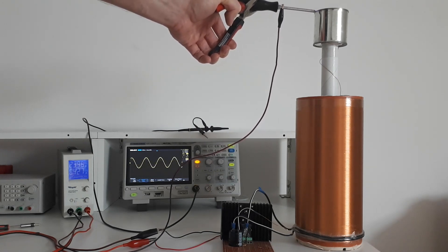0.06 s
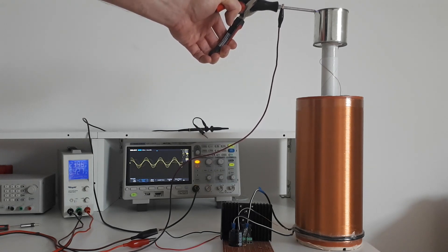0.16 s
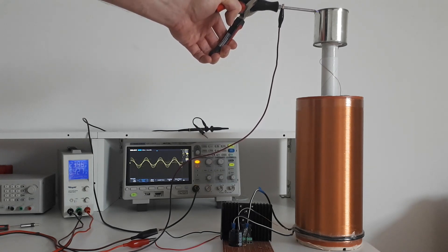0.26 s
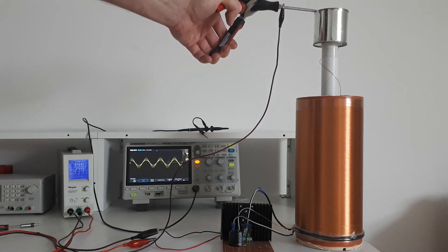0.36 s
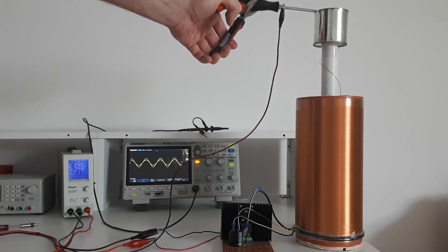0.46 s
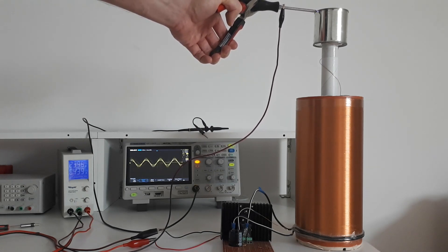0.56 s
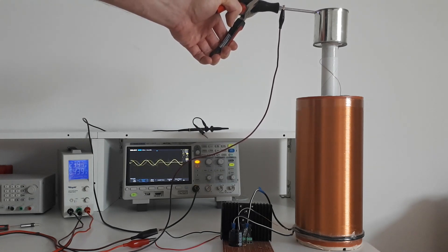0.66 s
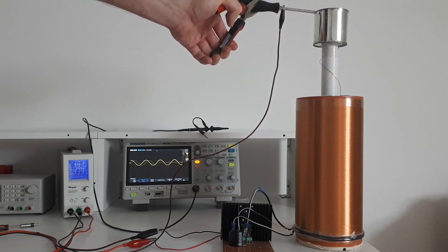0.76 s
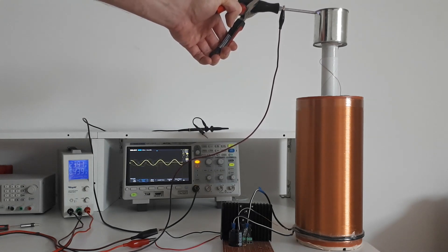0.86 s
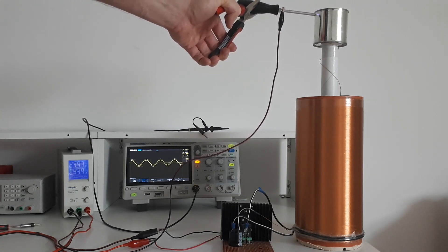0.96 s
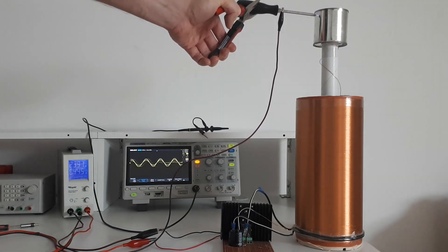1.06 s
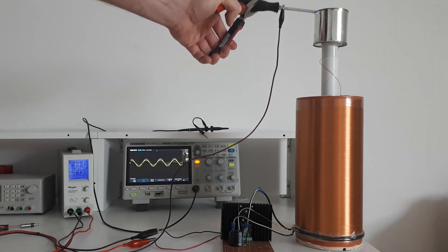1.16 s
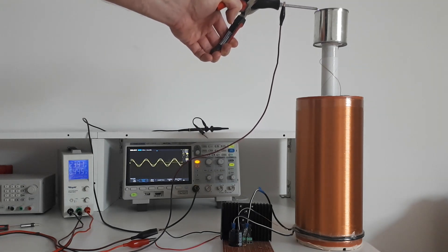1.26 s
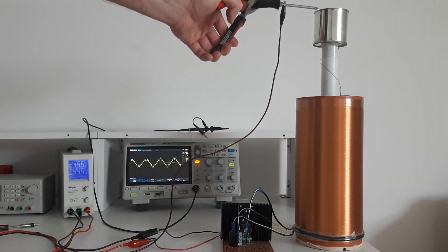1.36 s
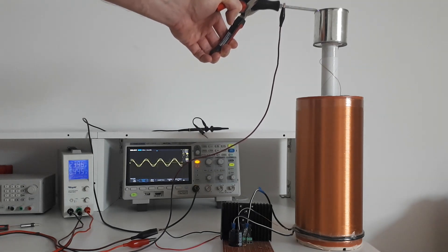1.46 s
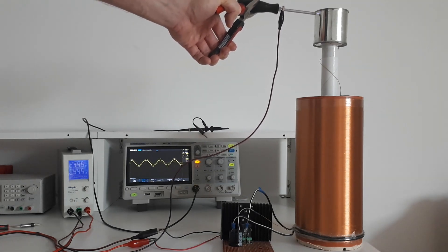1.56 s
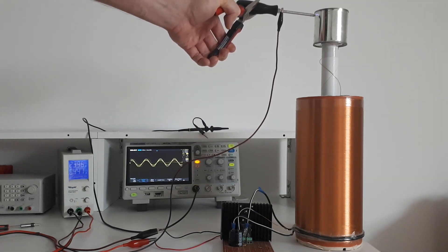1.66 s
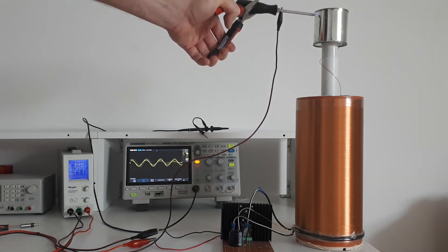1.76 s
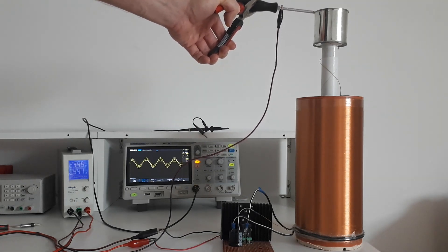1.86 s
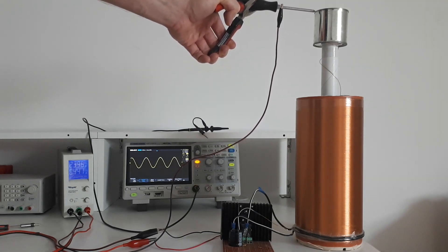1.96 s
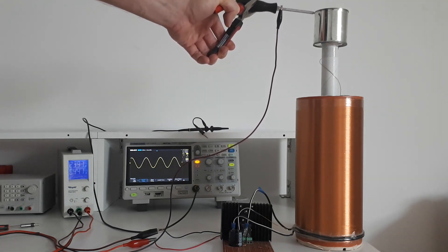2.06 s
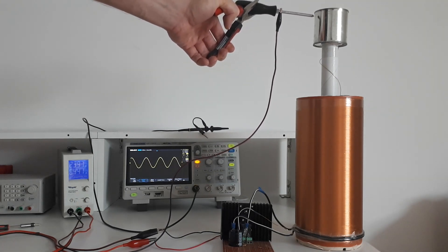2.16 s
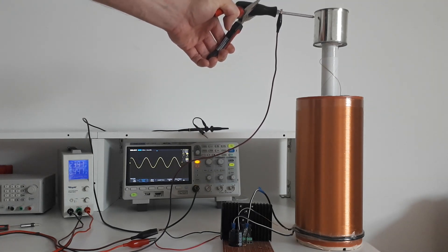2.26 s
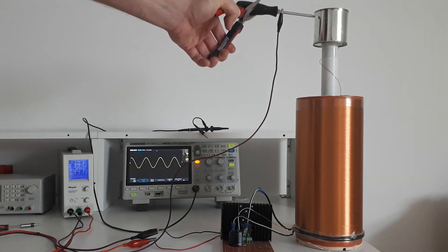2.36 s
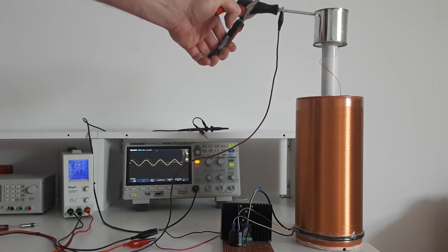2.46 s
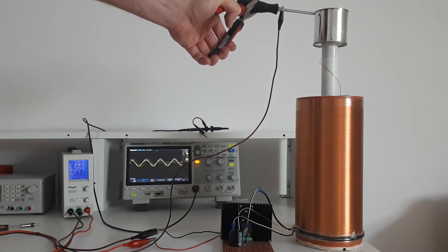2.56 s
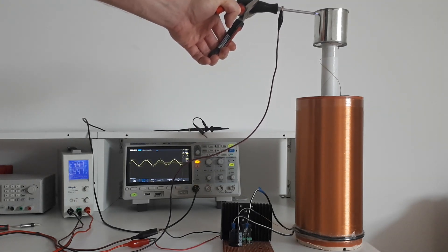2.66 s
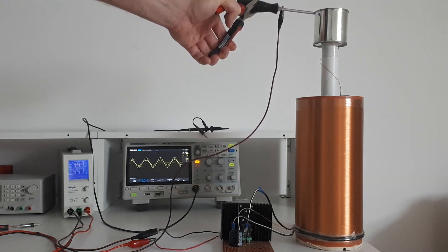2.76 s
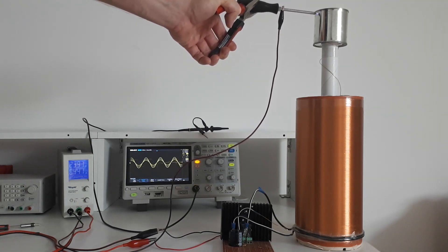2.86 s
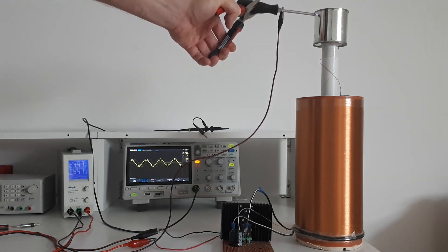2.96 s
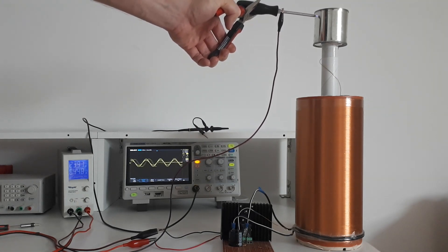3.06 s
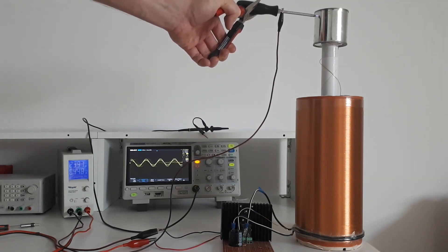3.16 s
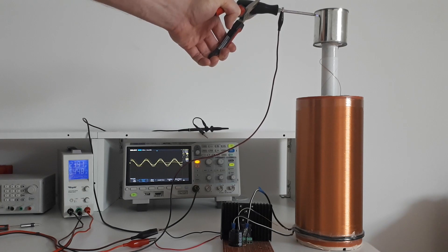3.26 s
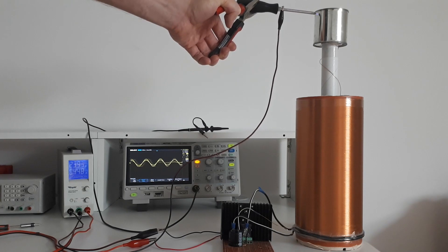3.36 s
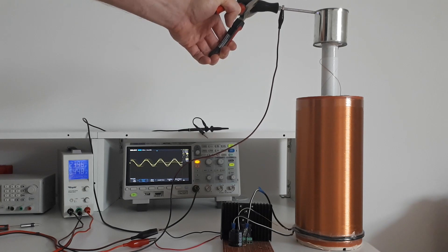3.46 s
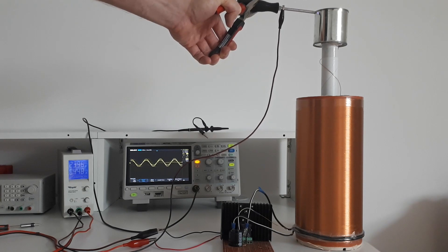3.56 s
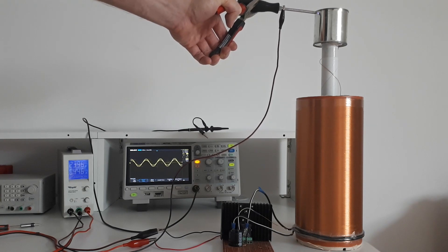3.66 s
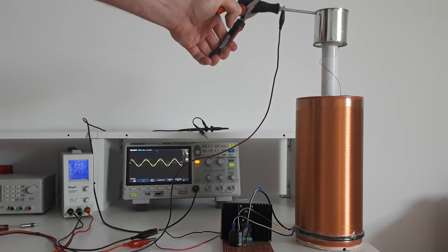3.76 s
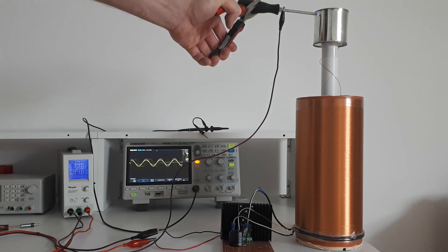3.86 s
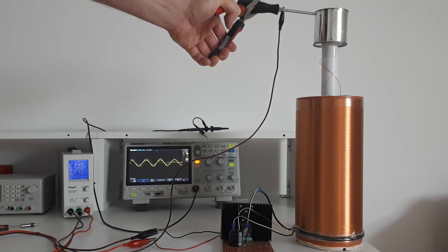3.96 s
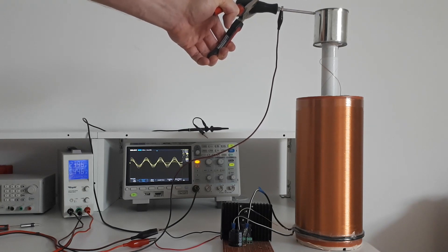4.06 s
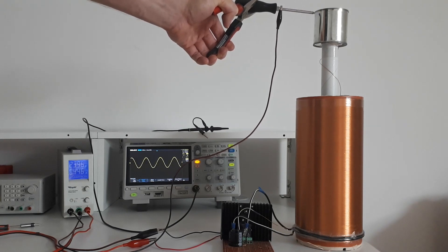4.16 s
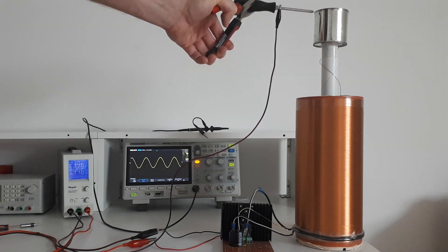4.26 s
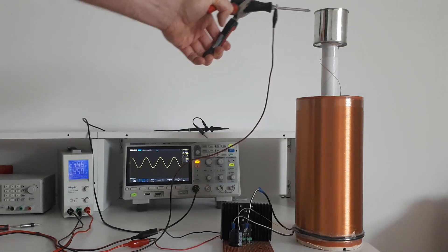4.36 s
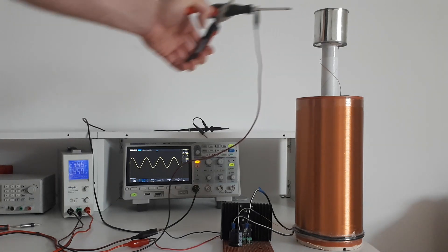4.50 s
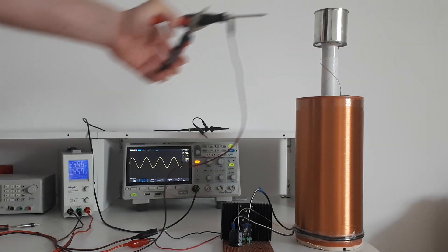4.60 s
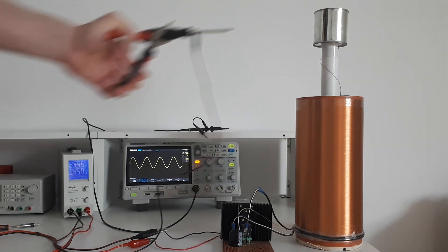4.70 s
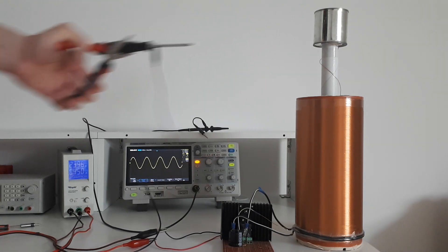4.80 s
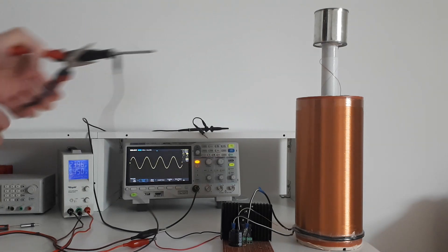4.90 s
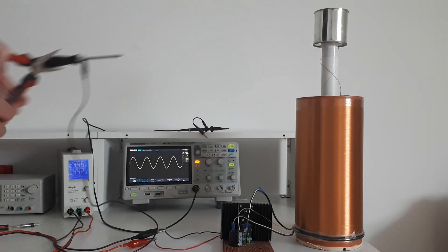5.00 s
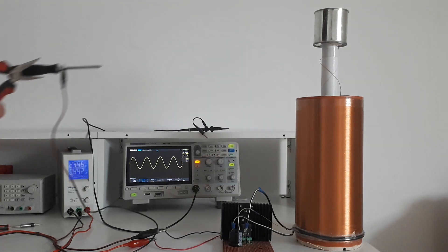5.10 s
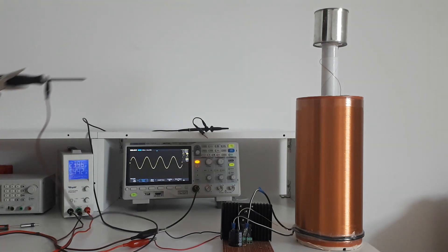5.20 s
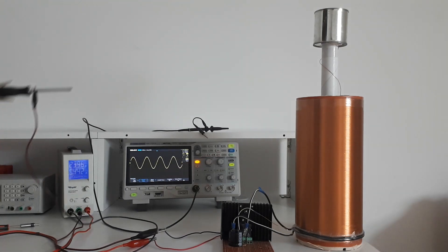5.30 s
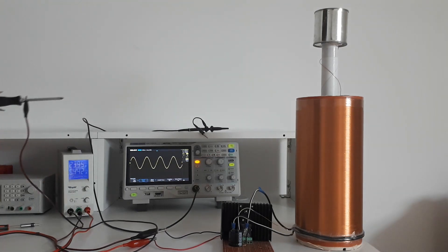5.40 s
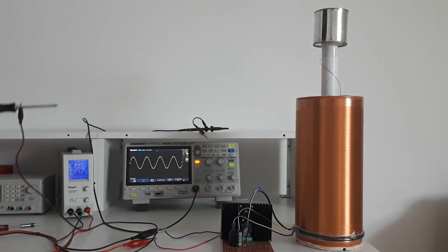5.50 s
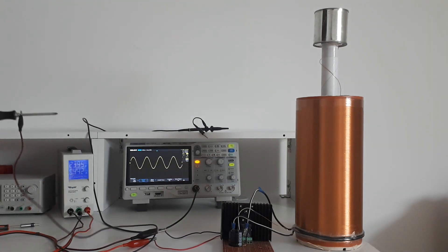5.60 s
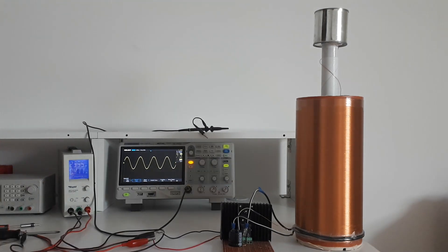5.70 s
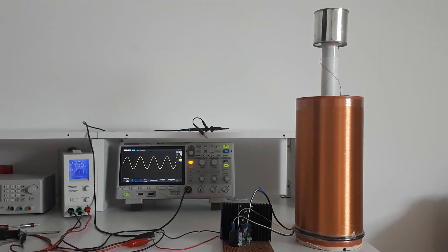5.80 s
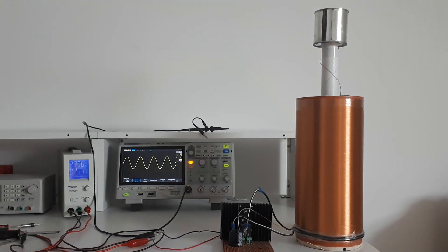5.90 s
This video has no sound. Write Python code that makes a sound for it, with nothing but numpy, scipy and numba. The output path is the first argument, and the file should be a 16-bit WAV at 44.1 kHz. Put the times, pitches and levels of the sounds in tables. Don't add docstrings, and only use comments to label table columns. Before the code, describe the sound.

A rasping, high-pitched electric sizzle crackles in two long bursts, its buzzing pitch jumping about, then stops, leaving faint fan hum in a bare room.

```python
import sys
import numpy as np
from scipy import signal
from scipy.fft import rfft, irfft, next_fast_len
from scipy.io import wavfile
from scipy.ndimage import map_coordinates
from numba import njit

SR = 44100
rng = np.random.default_rng(int(sys.argv[2]) if len(sys.argv) > 2 else 0)


def persist_wave(psi):
    counts = np.round(np.clip(psi, -1, 1) * 32767).astype(np.int16)
    wavfile.write(sys.argv[1], SR, np.atleast_2d(counts).T)


def to_linear_factor(level_db):
    exponent = np.asarray(level_db, float) / 20
    return 10 ** exponent


N = 261954

# pitch_hz, level_db
SPARK_COLOUR = [(600, -49.5), (1500, -13), (2000, -11.5), (2500, -8.5), (3200, -2), (5200, -1), (6900, 2),
                (7600, 5), (8700, -5), (9400, -4), (10300, 0), (12500, 3), (15600, 3.5)]


def unit(x):
    return x / np.sqrt(np.mean(x ** 2) + 1e-20)


def along(points, hz):
    f, v = np.transpose(points)
    return np.interp(np.log(hz + 1), np.log(f + 1), v)


def curves(rows):
    s, *columns = np.transpose(rows)
    return [np.interp(np.arange(N) / SR, s, column) for column in columns]


def wobble(rate):
    return map_coordinates(rng.standard_normal(N // 100), [np.arange(N) * rate / SR])


def filtered(x, response):
    m = 2 * next_fast_len(N // 2 + SR // 4)
    return irfft(rfft(x, m) * response(np.fft.rfftfreq(m, 1 / SR)), m)[..., :N]


def shaped_noise(noise, colour):
    return unit(filtered(noise, lambda hz: to_linear_factor(along(colour, hz))))


def sided(x, balance):
    return filtered(x, lambda hz: to_linear_factor(np.outer([.5, -.5], along(balance, hz))))


def resonance(hz, centre_hz, width_hz):
    return 1j * hz * width_hz / (centre_hz ** 2 - hz ** 2 + 1j * hz * width_hz)


def causal(points):
    def response(hz):
        cepstrum = irfft(np.log(to_linear_factor(along(points, hz))))
        half = len(cepstrum) // 2
        cepstrum[1:half] *= 2
        cepstrum[half + 1:] = 0
        return np.exp(rfft(cepstrum))
    return response


def fan_level(db, step_db, unsteady_db):
    switch_s, settle_s = 5.64, 0.036
    step = np.clip((np.arange(N) / SR - switch_s) / settle_s, 0, 1)
    return db + step_db * step + unsteady_db * wobble(4.87)


def fan_tones(draught_db, load_db):
    # pitch_hz, wander_hz, left_minus_right_db, left_lead_rad
    hums = [(305.3, 1.8, .5, .3), (356.2, .9, .5, .4), (1629, 2.5, 2.5, -1.5)]
    # level_db, step_at_change_over_db, unsteadiness_db
    tone_levels = [(-60.5, -24, 0.8), (-60.5, -10.5, 1.9), (-74.5, 10, 0.5)]
    whine_swell_db = 1.9 * draught_db
    swells_db = [load_db, load_db, whine_swell_db]
    tones = np.zeros((2, N))
    for (hz, wander_hz, side_db, lead_rad), level, swell_db in zip(hums, tone_levels, swells_db):
        tone_db = fan_level(*level) + swell_db + 3.0 + 1.14 * wobble(11)
        phase = 2 * np.pi * np.cumsum(hz + wander_hz * wobble(14)) / SR
        loudness = to_linear_factor(tone_db + [[side_db / 2], [-side_db / 2]])
        tones += loudness * np.sin(phase + [[lead_rad], [0]])
    return tones


def alike_noise():
    # pitch_hz, left_right_likeness (1 = the same)
    air_alike = [(60, 0.62), (180, 0.69), (550, 0.75), (1650, 0.092), (4970, 0.08), (15000, 0.05284)]

    def mix(hz):
        turn = np.arccos(np.clip(along(air_alike, hz), -1, 1)) / 2
        return np.array([np.cos(turn), np.sin(turn)])

    pair = filtered(rng.standard_normal((2, N)), mix)
    return np.array([pair[0] + pair[1], pair[0] - pair[1]])


def fan_air(noise, draught_db):
    # pitch_hz, level_db_per_hz
    air_colour = [(330, -28), (560, -3.5), (621, -7.5), (716, -3.5), (970, -3), (1340, -18.5),
                  (1660, -11.5), (1930, -17.5), (2200, -56), (2860, -53), (4840, -120)]
    boom_colour = [(150, -57), (230, -12), (330, 1.5), (400, -1.5), (480, -2.5), (570, -15.5), (800, -68)]
    deep_colour = [(15, -57), (30, -12.5), (60, -2), (120, 2.5), (190, -1.5), (260, -12), (500, -94)]
    passing_db, passing_s = 3.5, 3.7
    passing = passing_db * np.exp(-(np.arange(N) / SR / passing_s) ** 2)
    air_db = fan_level(-70.5, 3.2, 0.2) + draught_db + 2.5
    boom_db = fan_level(-64.5, -2.7, 1.8) + 4.0
    rumble_db = fan_level(-71.5, -3.5, 2.6) + passing - .7
    air = to_linear_factor(air_db) * shaped_noise(noise, air_colour)
    boom = to_linear_factor(boom_db) * shaped_noise(noise, boom_colour)
    return air + boom + to_linear_factor(rumble_db) * shaped_noise(noise, deep_colour)


def faint_orders(noise):
    # pitch_hz, width_hz, level_db
    weak = [(155.5, 1.85, -76), (203.2, 4.5, -79.5), (706.4, 2.6, -80), (1236, 6.1, -86.5),
            (1570, 790, -95)]
    out = np.zeros((2, N))
    for centre_hz, width_hz, db in weak:
        band = unit(filtered(noise, lambda hz: resonance(hz, centre_hz, width_hz)))
        out += to_linear_factor(db + fan_level(0.1, -3.5, 3.1)) * band
    return out


def fans():
    # start_s, draught_db (swells air and whine), motor_load_db (swells the hums)
    draught = [(0.0, -1, -3), (.46, 3.5, 1.2), (.66, 1.1, -4.5), (.95, 0.5, 2), (1.2, -.5, 0), (1.34, 0, 4),
               (1.56, 0.5, -6.5), (1.8, 3.5, 4), (2.0, -2, -3), (2.7, -2, 1.5), (2.86, 3.5, 2.2),
               (3.06, -3.5, -0.7), (3.34, -1.5, 1.5), (3.6, 2.5, -1.5), (4.5, -2, 0.6), (4.7, 0.3, 0.7),
               (5.2, -3, -4), (5.6, 0, -1.5)]
    # pitch_hz, left_minus_right_db
    air_side = [(60, 0.5), (200, 0.5), (380, 6.5), (700, 2.5), (1300, 0.5), (2400, 18.5)]
    draught_db, load_db = curves(draught)
    noise = alike_noise()
    return sided(fan_tones(draught_db, load_db) + fan_air(noise, draught_db) + faint_orders(noise), air_side)


def lingering():
    level_db, t60 = -56, 0.48
    noise = shaped_noise(rng.standard_normal((2, N)), SPARK_COLOUR)
    return to_linear_factor(level_db - 60 * np.arange(N) / SR / t60) * noise


def room(x):
    # pitch_hz, time_to_fall_60_db_s
    decay = [(1500, 0.34), (4000, 0.33), (7000, 0.43), (11000, 0.31), (16000, 0.27)]
    # pitch_hz, level_db
    wet = [(1500, 3.5), (5000, 4), (9000, 3.5), (12000, 0.5), (15500, 0)]
    # pitch_hz, left_minus_right_db
    spark_side = [(60, -4), (180, 7), (550, -14), (1650, 2.5), (4970, 3), (15000, 1.0)]
    left_lag_s = 3.1 / SR
    direct = filtered(np.array([x, x]), lambda hz: np.exp(-2j * np.pi * np.outer([left_lag_s, 0], hz)))
    hz, t, z = signal.stft(rng.standard_normal((2, SR // 2)), SR, nperseg=256)
    fall = to_linear_factor(-60 * t / along(decay, hz)[:, None])
    fall *= (to_linear_factor(along(wet, hz)) / np.linalg.norm(fall, axis=1))[:, None]
    tail = signal.istft(z * fall, SR, nperseg=256)[1] / np.sqrt(128)
    walls = signal.fftconvolve(np.pad(x, (90, 0))[None], tail, axes=1)[:, :N]
    both = filtered(direct + walls, lambda hz: 1 / np.sqrt(1 + to_linear_factor(along(wet, hz)) ** 2))
    return sided(both, spark_side)


def lead():
    # start_s, level_db, centre_hz, width_hz
    ticks = [
        (4.51, -67, 2900, 900),
        (4.708, -74, 14500, 8950),
        (4.789, -72, 3600, 3010),
    ]
    out = np.zeros(N)
    for s, db, centre_hz, width_hz in ticks:
        blow = np.zeros(N)
        blow[round(s * SR):][:60] = to_linear_factor(db + 20) * rng.standard_normal(60)
        out += filtered(blow, lambda hz: resonance(hz, centre_hz, width_hz) ** 2)
    return out


def pace():
    # start_s, first_rate_hz, last_rate_hz, interval_scatter (0-1)
    spells = [(0.0, 2996, 3020, 0.56), (.1, 4324, 4260, .28), (.183, 1999, 2343, 0.29),
              (.633, 4697, 4454, 0.18), (.903, 5700, 4607, 0.21), (1.135, 6750, 5580, 0.27),
              (1.263, 3203, 2985, 0.25), (1.353, 2344, 2670, .3), (1.533, 5866, 4890, 0.24),
              (1.713, 7602, 6994, .21), (1.83, 5998, 5602, .36), (2.39, 6580, 5183, .21),
              (2.7, 5110, 4690, .33), (2.823, 2987, 2990, .6), (2.913, 4026, 6420, 0.26),
              (3.44, 5607, 4160, .4), (3.573, 2985, 2998, 0.7), (3.633, 3392, 3264, .25),
              (3.83, 4415, 6125, 0.24)]
    slip_s, last_s = .03, 4.065
    ends = np.r_[[spell[0] - slip_s for spell in spells[1:]], last_s]
    rows = []
    for (s, first_hz, last_hz, scatter), end in zip(spells, ends):
        rows += [(s, first_hz, scatter), (end, last_hz, scatter)]
    return curves(rows)


def strength():
    # start_s, level_db
    power = [
        [(0.021, -34), (0.04, -43)],
        [(0.11, -39.5), (0.3, -36.5), (0.762, -43), (0.95, -36.5), (1.07, -33.5), (1.232, -39), (1.394, -36.5),
         (1.53, -41), (1.6, -34.5)],
        [(2.39, -43), (2.45, -37), (3.0, -38), (3.04, -36), (3.5, -37), (3.6, -36.5), (3.794, -38.5),
         (3.966, -37)],
    ]
    # middle_s, change_db, half_length_s
    falters = [(.928, -5, 0.019), (1.104, -12, 0.045), (1.558, 6, 0.013), (1.586, -3.5, .018),
               (1.711, -3, 0.031), (1.786, 3, 0.042), (1.817, -10, 0.02), (1.853, 2, .016),
               (1.19, 1.5, .025), (2.778, -6, 0.025), (3.27, -4, 0.041), (3.528, -2.5, 0.031),
               (4.006, -1, 0.037), (4.046, 3, 0.031)]
    t = np.arange(N) / SR
    level_db = curves(np.vstack(power))[0]
    for s, db, half_s in falters:
        level_db = level_db + db * np.clip(1 - abs(t - s) / half_s, 0, 1)
    return level_db


@njit
def firing(period, scatter, chance):
    times = np.zeros(len(chance))
    now = 0.
    for k in range(len(chance)):
        i = min(int(now), len(period) - 1)
        now += period[i] * np.exp(scatter[i] * chance[k] - scatter[i] ** 2 / 2)
        times[k] = now
    return times


def sparks():
    # start_s, end_s
    strikes = [
        (.021, .028),
        (0.1073, 1.858),
        (2.387, 4.065),
    ]
    # start_s, level_over_neighbours_db
    snaps = [(.0242, 7.5), (.1775, 6), (0.52, 6), (0.5872, 8), (1.2645, 1), (1.611, 6), (1.7968, 9),
             (2.7286, 5), (2.8077, 9), (2.8504, 11), (3.5789, 4), (3.6087, 13), (3.687, 1)]
    size_db, flutter_db, charge_db = -1.2, 1.75, 1.5
    rate_hz, scatter = pace()
    scatter = np.clip(scatter, .05, .9)
    chance = rng.standard_normal((60000, 2))
    times = firing(SR / rate_hz, scatter, chance[:, 0])
    keep = sum((times > a * SR) & (times < b * SR) for a, b in strikes) > 0
    times, chance = times[keep], chance[keep]
    waited = np.minimum(scatter[times.astype(int)] * chance[:, 0], 1.2)
    snap_s, snap_db = np.transpose(snaps)
    times = np.r_[times, snap_s * SR]
    extra_db = np.r_[charge_db * waited + size_db * chance[:, 1], snap_db]
    index = times.astype(int)
    level_db = strength() + flutter_db * wobble(90)
    size = to_linear_factor(level_db[index] + extra_db + 3.0) * np.sqrt(SR / rate_hz[index])
    taps = index[:, None] + np.arange(-8, 9)
    offset = taps - times[:, None]
    kernel = np.sinc(offset) * np.cos(np.pi * offset / 18) ** 2
    train = np.bincount(taps.ravel(), (size[:, None] * kernel).ravel(), N)[:N]
    return filtered(train, causal(SPARK_COLOUR))


def scene():
    return room(sparks() + lead()) + fans() + lingering()


def microphone_hiss():
    # pitch_hz, level_db_per_hz
    hiss_colour = [(900, -39), (2000, 0.5), (4000, -5), (6500, -5), (9000, -6.5), (15000, -5), (15800, -9),
                   (16600, -35)]
    port_colour = [(6300, -45), (6900, 2), (7200, 5), (7800, 9), (8200, -17), (8700, -36)]
    hiss = to_linear_factor(-76.0) * shaped_noise(rng.standard_normal((2, N)), hiss_colour)
    port = to_linear_factor([[-75], [-85]]) * shaped_noise(rng.standard_normal((2, N)), port_colour)
    return hiss + port


def top_cut(x):
    return signal.sosfilt(signal.butter(12, 15750, fs=SR, output="sos"), x)


def record(dry):
    edge_hz, edge_width_hz = 15950, 250
    mix = filtered(dry + microphone_hiss(), lambda hz: np.clip((edge_hz - hz) / edge_width_hz, 0, 1))
    return top_cut(mix)


dry = scene()
out = record(dry)
persist_wave(out)
```